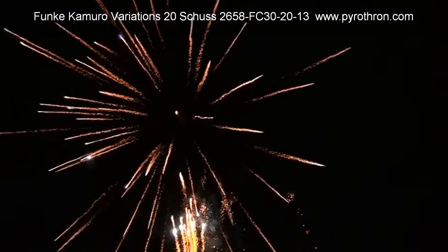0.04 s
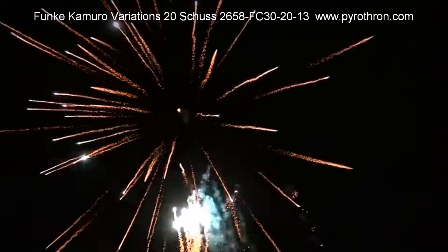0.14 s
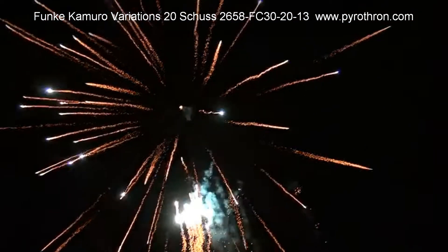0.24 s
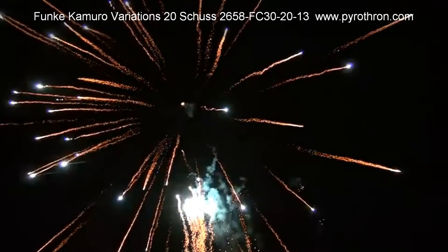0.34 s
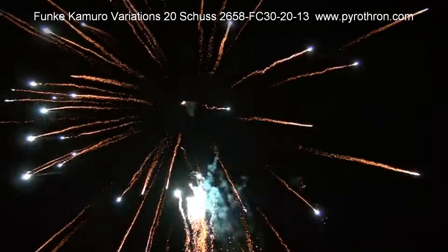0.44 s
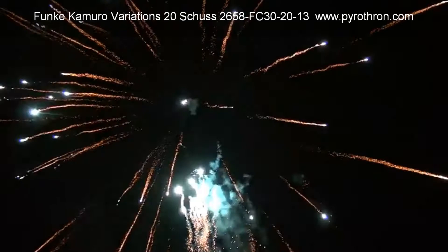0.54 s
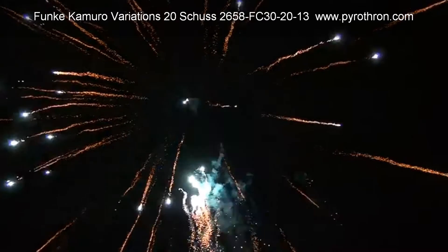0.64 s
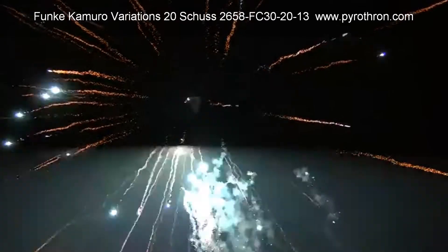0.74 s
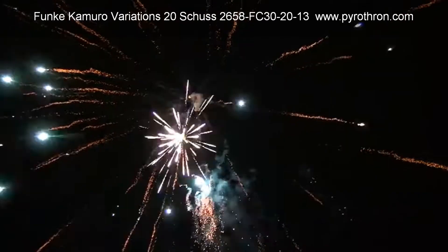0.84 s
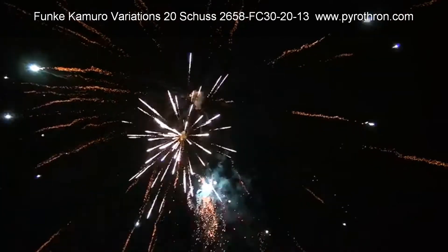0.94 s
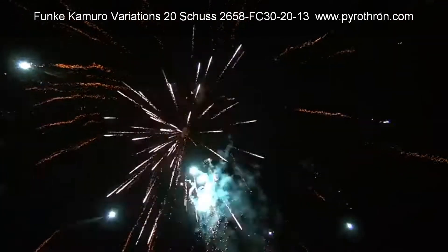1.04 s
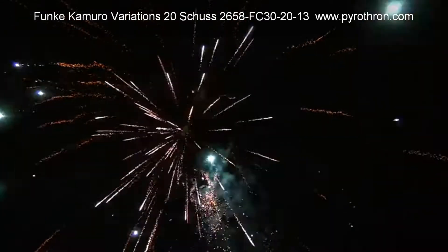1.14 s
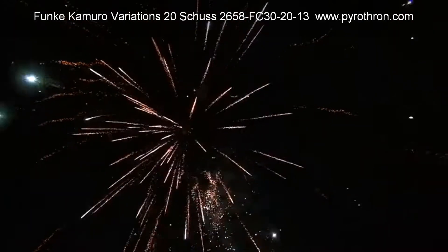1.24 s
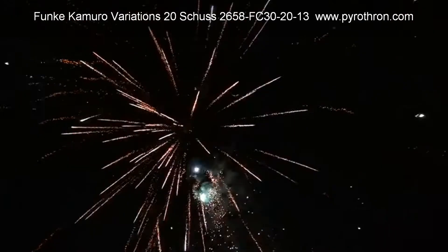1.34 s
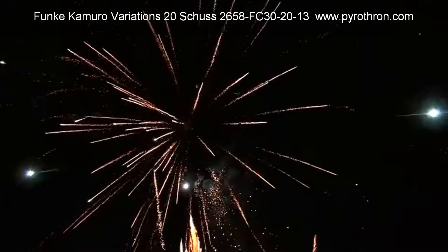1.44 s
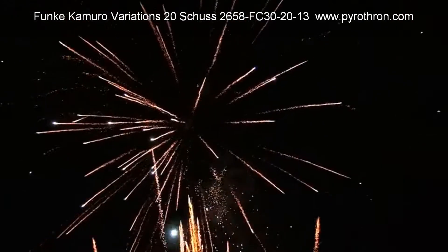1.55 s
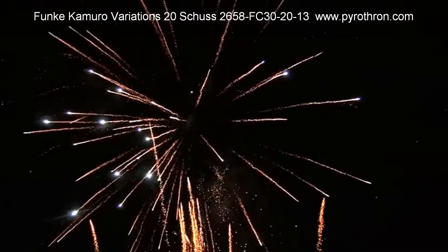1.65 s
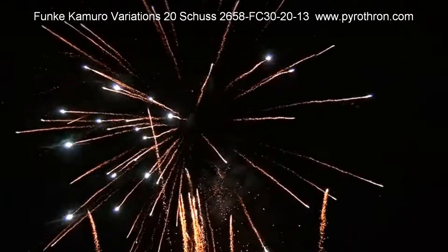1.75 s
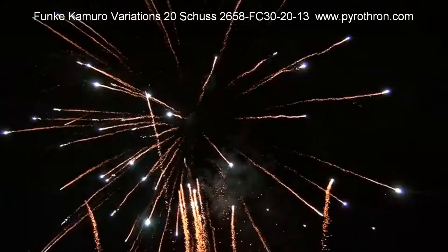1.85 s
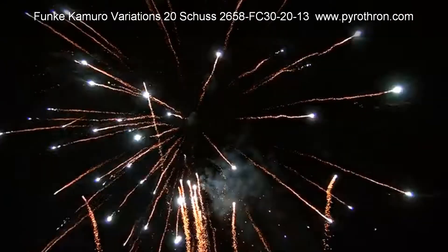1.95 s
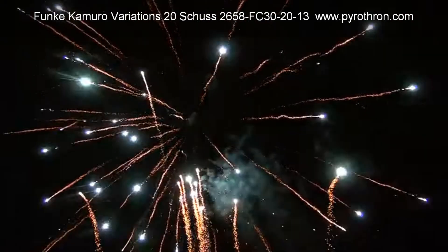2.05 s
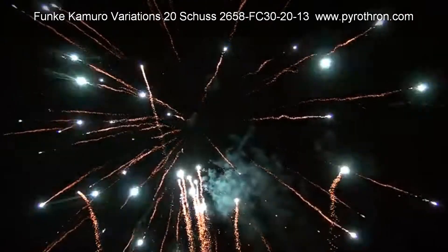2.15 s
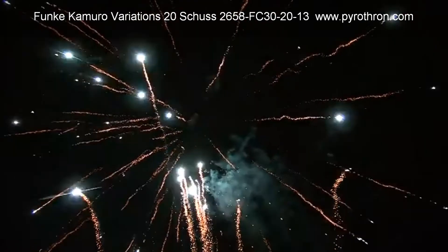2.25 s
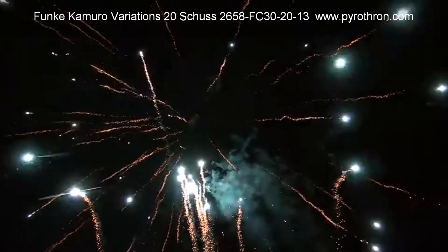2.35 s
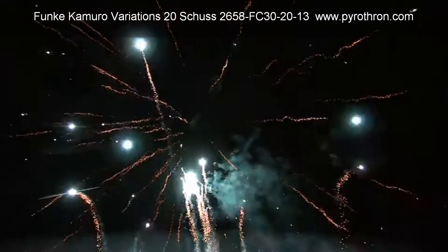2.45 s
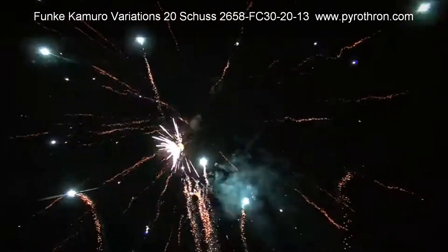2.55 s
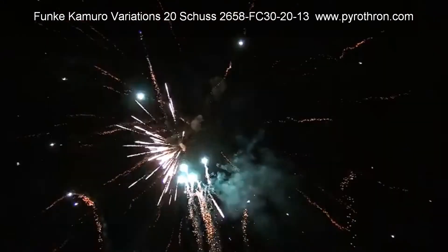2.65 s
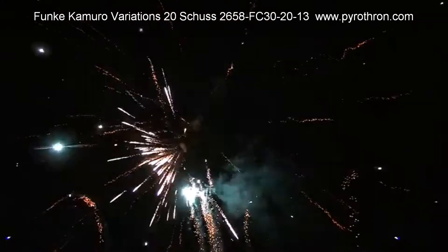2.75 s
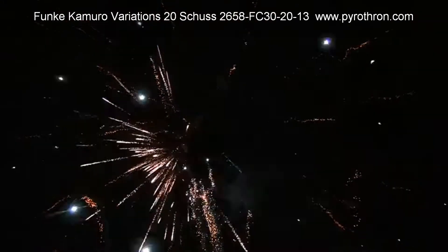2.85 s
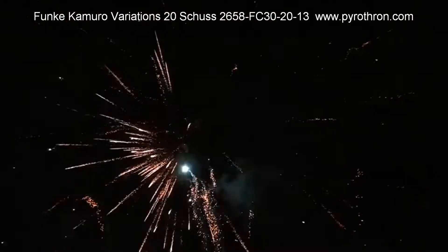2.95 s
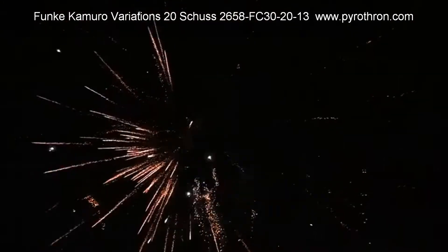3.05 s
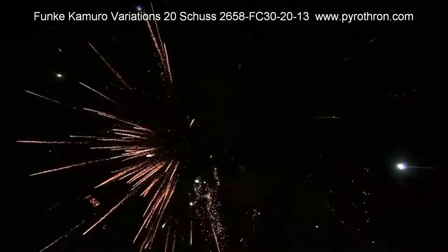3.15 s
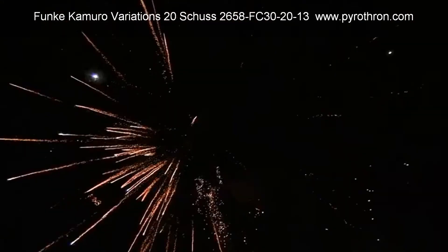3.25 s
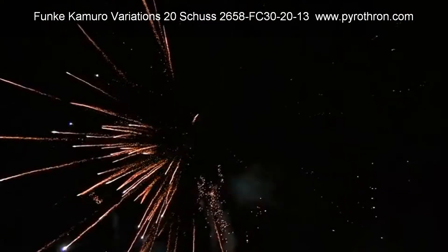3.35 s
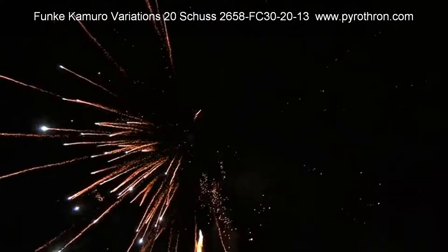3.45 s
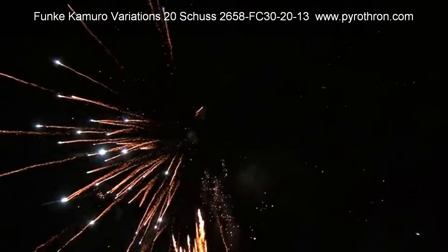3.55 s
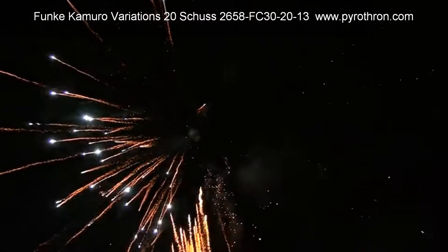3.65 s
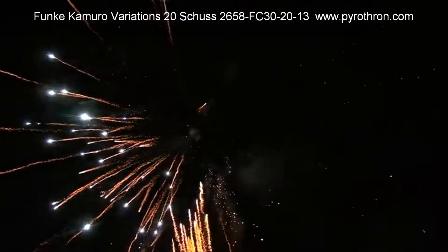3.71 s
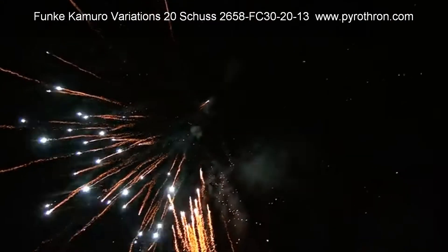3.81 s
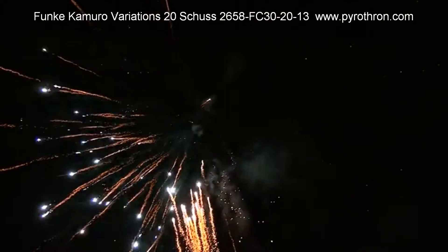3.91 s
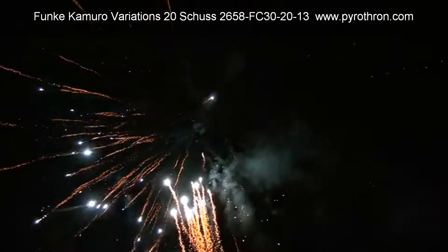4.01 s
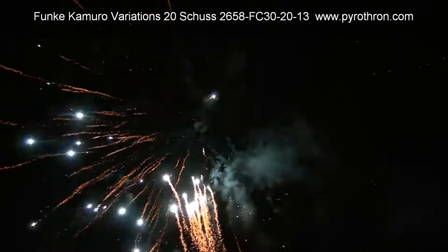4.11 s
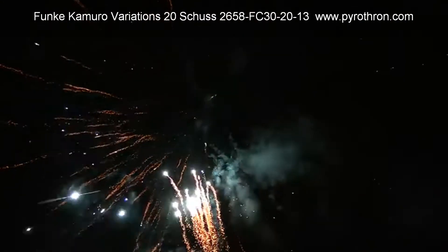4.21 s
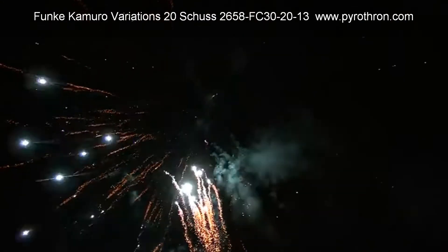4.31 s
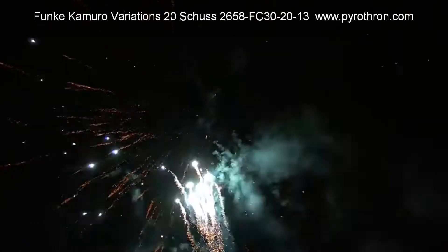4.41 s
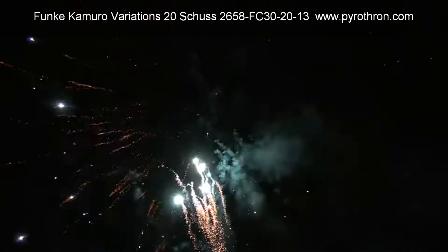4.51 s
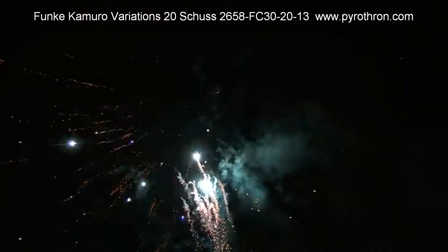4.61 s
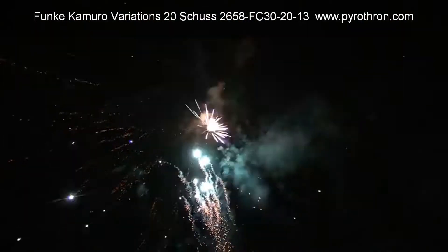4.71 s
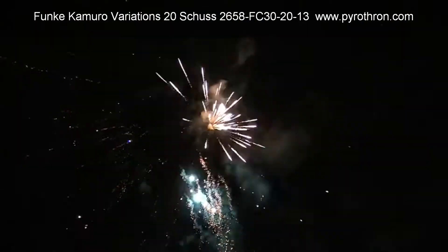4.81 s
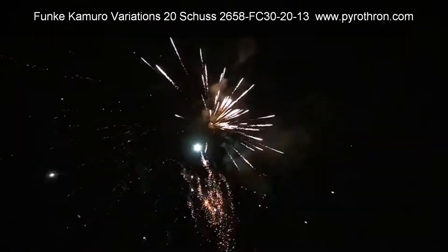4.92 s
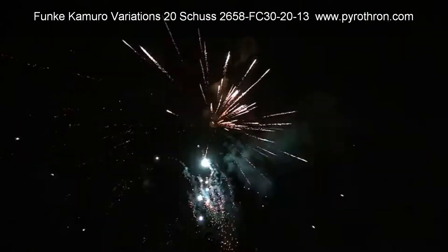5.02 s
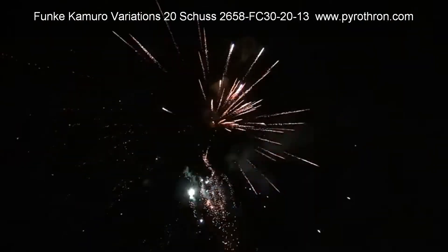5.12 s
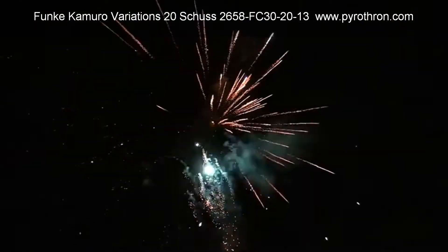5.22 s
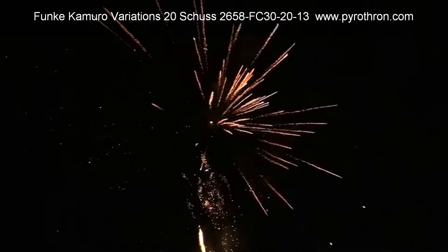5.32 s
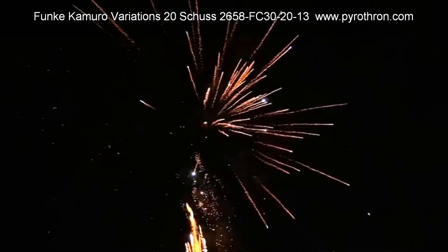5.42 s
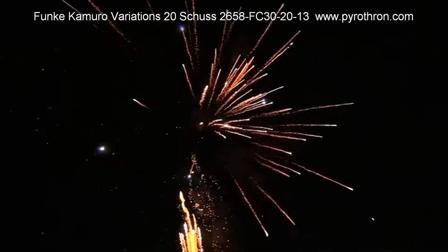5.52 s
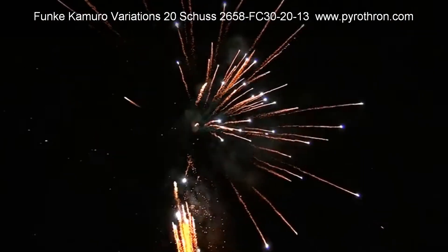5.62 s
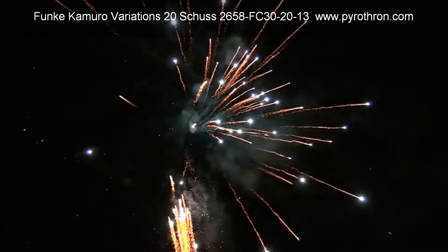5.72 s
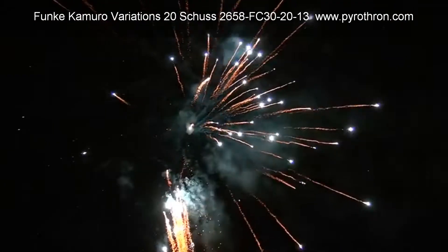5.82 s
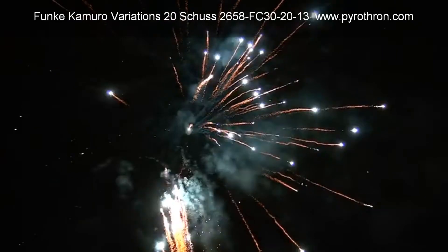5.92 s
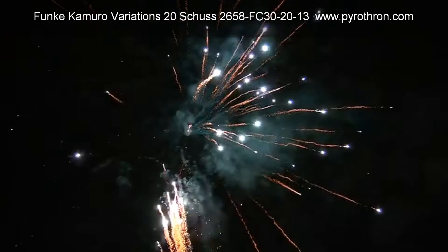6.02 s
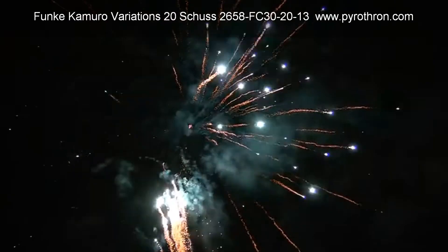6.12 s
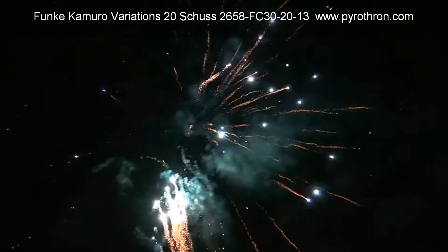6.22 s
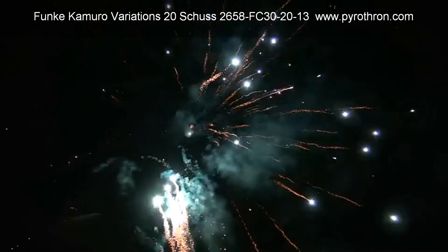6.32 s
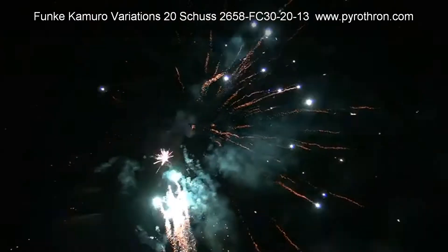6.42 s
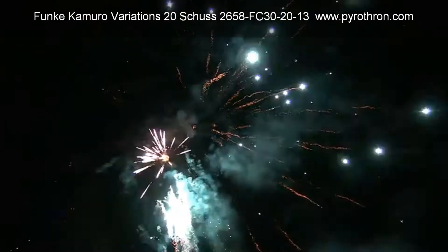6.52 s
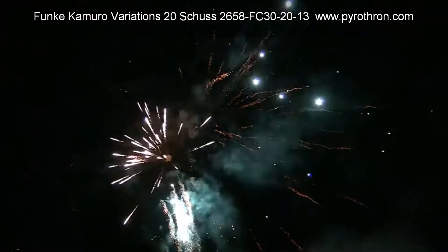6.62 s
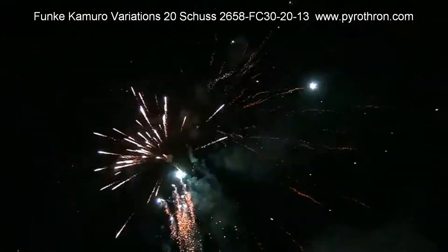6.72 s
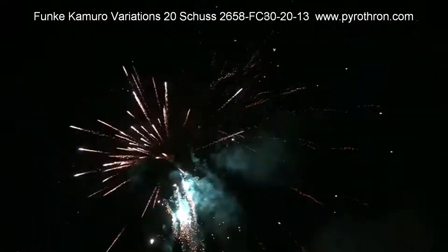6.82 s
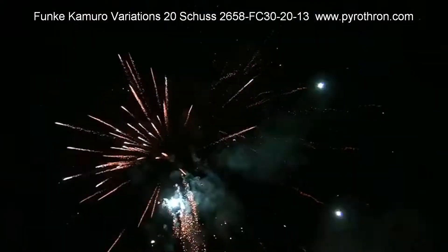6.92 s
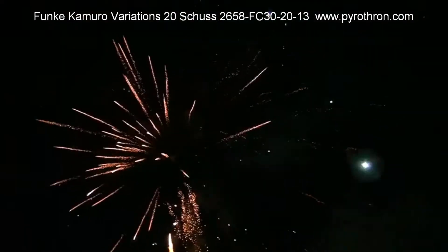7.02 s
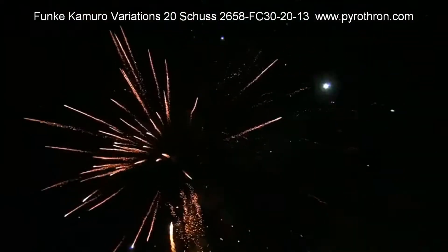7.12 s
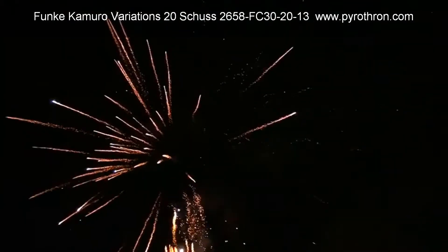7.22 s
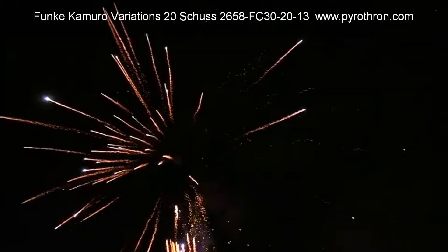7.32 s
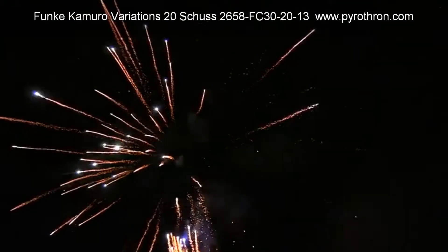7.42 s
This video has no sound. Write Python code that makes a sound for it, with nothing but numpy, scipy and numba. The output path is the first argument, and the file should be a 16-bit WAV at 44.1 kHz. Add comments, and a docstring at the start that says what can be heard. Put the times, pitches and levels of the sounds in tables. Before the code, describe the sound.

A firework battery fires steadily outdoors: thumping launches, cracking bursts, rushing echoes and a soft star fizz, heard through a hissy camcorder microphone.

```python
"""A firework battery outdoors at night, heard through a camcorder, over hiss and a thin fluttering whine.
It opens in the echoes of a shell that has already burst; four more burst about every two seconds.
Each launch spits and thumps in its tube, then slaps back from a wall; each shell bursts overhead with a crack
and a boom, rushes through nearby trees, and knocks and rolls back from the same surroundings, then its stars fizz.
Gain control ducks at loud bangs and lets the hiss back up."""
import sys
import numpy as np
from scipy import signal
from scipy.fft import rfft, irfft, next_fast_len
from scipy.io import wavfile
from scipy.ndimage import uniform_filter1d, minimum_filter1d
from numba import njit

SR = 44100
rng = np.random.default_rng(int(sys.argv[2]) if len(sys.argv) > 2 else 0)


def store_pcm(level_fs):
    """Save levels as 16-bit WAV."""
    pcm = np.round(np.clip(level_fs, -1, 1) * 32767).astype(np.int16)
    wavfile.write(sys.argv[1], SR, np.atleast_2d(pcm).T)


N = 328986

# shell bursts: (time [s], crack [dB], boom [dB], rush [dB], far echo [dB], fizzing stars [dB],
# extra travel to the walls [s])
BURSTS = [(-.57, 0, 0.5, -3, 2, -49.5, 0.016), (0.9524, 0, 0, 2.5, -0.5, -55, 0.0083),
          (2.674, -3, -2, 1.5, 0, -58, 0.0079), (4.852, -9, -1, 1.5, 0, -57.5, 0.0018),
          (6.604, 4, -4.5, -2.5, -2, -66, 0)]
# spectrum of the far roll: (frequency [Hz], relative level per Hz [dB])
FAR_SPECTRUM = [(25, -40), (60, -19), (120, -17), (210, -2), (300, -2), (410, 1.5), (560, 0.5), (780, -9),
                (1050, -9), (1700, -14.5), (2800, -22.5), (4500, -31.5), (8000, -49.5), (16000, -65)]
# spectrum of a knock from a wall: (frequency [Hz], relative level per Hz [dB])
WALL_SPECTRUM = [(60, -20), (200, 6), (450, 8), (1000, 3), (1800, -4), (3000, -17), (5000, -37),
                 (9000, -55)]
# stretches of trees and buildings that return the far roll:
# (delay [s], half-width [s], level [dB], left minus right [dB])
FAR_ECHOES = [(.03, .12, -4.5, 3.5), (.32, 0.25, -1.5, 2.5), (.57, 0.11, -5, -4), (.68, 0.093, -10, 1),
              (.84, 0.23, -15, 2), (1.17, 0.24, -17.5, 2.5), (1.43, 0.14, -27.5, 6.5), (1.75, 1, -35, 1)]
# sign of the side signal in each channel: (left), (right)
SIDES = np.array([[1], [-1]])
TRAVEL = np.arange(int(2.6 * SR)) / SR  # travel times of the echoes, s


def undb(db):
    """Decibels to gain."""
    return 10 ** (np.asarray(db) / 20)


def contour(points, hz):
    """Gain of a (frequency [Hz], level [dB]) table, joined on a log-frequency axis."""
    f, db = np.transpose(points)
    return undb(np.interp(np.log(hz + 1), np.log(f), db))


def colour(x, points, spread_db):
    """Shape two white signals with one spectrum, power kept; one is the middle, the other the diffuse side."""
    # the microphone pair: (frequency [Hz], diffuse side minus middle before spread_db [dB])
    width = [(30, -7), (60, -16), (150, -14), (1300, -26.5), (3200, -18), (4400, -12), (5600, 3.5),
             (6500, 4), (8500, 2.5), (16000, 4.5)]
    size = next_fast_len(x.shape[1] + 2048)
    hz = np.arange(size // 2 + 1) * SR / size
    gain = contour(points, hz)
    mid, side = rfft(x, size) * gain / np.sqrt(np.mean(gain ** 2))
    side = side * contour(width, hz) * undb(spread_db)
    return irfft(mid + SIDES * side, size)[:, :x.shape[1]]


def add(out, x, start):
    """Mix x into out at a time in seconds, cutting what falls outside."""
    i = int(round(start * SR))
    a, b = max(i, 0), min(i + x.shape[-1], N)
    if b > a:
        out[:, a:b] += x[..., a - i:b - i]


@njit
def lowpass(x, hz):
    """One-pole low-pass with a moving corner."""
    y, low = np.empty(len(x)), 0.
    for i in range(len(x)):
        g = np.tan(np.pi * min(hz[i], .49 * SR) / SR)
        v = (x[i] - low) * g / (1 + g)
        y[i] = low + v
        low = y[i] + v
    return y


@njit
def follow(x, attack, release):
    """Envelope that rises at one rate and sinks at another, starting from the first peak."""
    y, e = np.empty(len(x)), x[:SR // 20].max()
    for i in range(len(x)):
        e += (x[i] - e) * (attack if x[i] > e else release)
        y[i] = e
    return y


def lean(pan_db):
    """Left and right gains of a sound from one side; pan_db is left minus right."""
    return undb(SIDES * pan_db / 2)


def swell(t, peak_s, half_width_s):
    """A bell-shaped rise and fall."""
    return np.exp(-np.minimum(((t - peak_s) / half_width_s) ** 2, 20))


def returns(echoes):
    """Echo strength left and right by travel time: each reflector group gives one swell, and powers add."""
    power = 0
    for delay_s, width_s, db, pan_db in echoes:
        power = power + (undb(db) * lean(pan_db) * swell(TRAVEL, delay_s, width_s)) ** 2
    return np.sqrt(power)


def scatter(strength, spectrum, air_hz, grain_db, clump_db, spread_db):
    """A bang thrown back by countless reflectors: each sends one small copy, later ones duller from the air."""
    t = TRAVEL
    draw = rng.standard_normal((4, len(t)))
    # reflectors stand in groups, so the copies arrive in clumps, about ninety a second
    clumps = np.interp(t * 90, np.arange(len(t)), draw[3])
    sizes = undb(grain_db * draw[2] + clump_db * clumps)
    copies = draw[:2] * sizes / np.sqrt(np.mean(sizes ** 2))
    sound = colour(copies, spectrum, spread_db)
    # air absorbs with the square of frequency: each corner is air_hz after one second of travel
    corner = air_hz / np.sqrt(t + 1 / SR)
    dulled = np.array([lowpass(lowpass(c, corner), corner) for c in sound])
    # the farthest reflectors thin out to nothing over the last half second
    return dulled * strength * np.minimum((t[-1] - t) / .5, 1)


def snap(spectrum, decay_s, front):
    """A sharp pressure front with a short noisy wake, centred in a tenth of a second."""
    t = np.arange(-SR // 20, SR // 20) / SR
    x = rng.standard_normal((2, len(t))) * np.exp(-np.abs(t) / decay_s) * (t >= 0)
    x[0, np.argmin(np.abs(t))] += front
    return colour(x, spectrum, spread_db=6)


def background():
    """The stars of each shell fizz as they burn out, over steady microphone hiss and a thin fluttering whine."""
    # hiss spectrum: (frequency [Hz], relative level per Hz [dB])
    hiss_spectrum = [(100, -12), (3000, -7), (6000, 6.5), (9000, 0), (13000, 2), (16000, -1)]
    hiss_db, whine_db, whine_hz = -63.5, -63.5, 4350
    t = np.arange(N) / SR
    fizz = 0
    for s, _, _, _, _, fizz_db, _ in BURSTS:
        fizz = fizz + undb(fizz_db) * swell(t - s, peak_s=1.1, half_width_s=.55)
    noise = colour(rng.standard_normal((2, N)), hiss_spectrum, spread_db=-7.0)
    hiss = noise * np.hypot(undb(hiss_db), fizz)  # hiss and fizz add in power
    # slow noise sets the strength of the whine
    flutter = uniform_filter1d(uniform_filter1d(rng.standard_normal(N), size=120), size=80)
    whine = flutter / flutter.std() * np.sin(2 * np.pi * whine_hz * t)
    return hiss + undb(whine_db) * whine


def rushes():
    """Twigs and leaves scatter each crack into a bright rush, in one surge for each belt of trees."""
    # rush spectrum: (frequency [Hz], relative level per Hz [dB])
    rush_spectrum = [(100, -16.5), (500, 3.5), (900, -3), (1200, 2.5), (1900, -3), (3000, -7),
                     (4800, -16.5), (6000, -16), (8500, -26), (12000, -25.5), (16000, -33)]
    # belts of trees: (delay [s], half-width [s], level [dB], left minus right [dB])
    tree_echoes = [(.072, 0.044, -2, -0.5), (.15, 0.048, -5, 2), (.28, 0.15, -7, -0.5),
                   (.55, 0.25, -20, -4), (1.2, 0.43, -40, -2.5)]
    out = np.zeros((2, N))
    trees = returns(tree_echoes)
    for s, _, _, rush_db, *_ in BURSTS:
        rush = scatter(trees, rush_spectrum, air_hz=7060, grain_db=4, clump_db=1.5, spread_db=0.0)
        add(out, undb(rush_db) * rush, s)
    return out


def knocks():
    """Every large wall returns one dull knock of every burst, a little later if the shell is farther off."""
    # large distant walls that stand out of the roll: (delay [s], level [dB], left minus right [dB])
    walls = [(.473, -10, -2.5), (.634, -13.5, 2), (0.672, -13.5, 5), (.94, -16.5, 1), (1.065, -21.5, 4),
             (1.229, -21.5, 2), (1.408, -30, 4), (1.425, -28.5, -2), (1.819, -33, 0)]
    out = np.zeros((2, N))
    for s, _, _, _, far_db, _, detour_s in BURSTS:
        for delay_s, db, pan_db in walls:
            knock = snap(WALL_SPECTRUM, decay_s=.0075, front=14)
            add(out, undb(far_db + db) * lean(pan_db) * knock, s + delay_s + detour_s - 1 / 20)
    return out


def spit(width_s):
    """A few milliseconds of gas tearing out of the muzzle, centred in a tenth of a second."""
    # gas spectrum: (frequency [Hz], relative level per Hz [dB])
    gas_spectrum = [(200, -6), (1000, 3), (2800, 2), (4800, 1), (7000, -7), (12000, -7), (16000, -13)]
    t = np.arange(-SR // 20, SR // 20) / SR
    puff = rng.standard_normal((2, len(t))) * np.exp(-(t / width_s) ** 2)
    return colour(puff, gas_spectrum, spread_db=-8)


def thump(hz, length_s):
    """The air column of the tube swings for three to four cycles."""
    t = np.arange(int(length_s * SR)) / SR
    return -np.sin(2 * np.pi * hz * t) * np.sin(np.pi * t / length_s)


def launches():
    """Gas spits, the tube thumps, a wall throws both back, the surroundings rumble and a weak roll returns."""
    # launches: (time [s], spit [dB], spit half-width [s], thump [dB], wall slap [dB], tail [dB])
    launch_table = [(1.136, -6, 0.0026, 11, 21, -5), (3.158, -3.5, 0.0028, 17, 22.5, 3.5),
                    (5.045, -4, 0.0038, 22, 21.5, 4.5), (6.5512, -13, 0.0045, 13.5, 18, 0)]
    # rumble spectrum: (frequency [Hz], relative level per Hz [dB])
    rumble_spectrum = [(25, -35), (55, -5.5), (100, 3.5), (160, -2.5), (300, -5.5), (800, -14.5),
                       (1400, -16.5), (3000, -24), (6000, -37.5), (9000, -45.5), (16000, -45.5)]
    slap_s = .032  # delay of the wall behind the battery
    battery_pan_db, roll_db = 3.5, -16  # the roll is weaker than that of a burst
    direct, roll = np.zeros((2, N)), np.zeros((2, N))
    fade = undb(-42 * TRAVEL)  # 42 dB per second
    far = returns(FAR_ECHOES)
    for s, spit_db, spit_s, thump_db, wall_db, tail_db in launch_table:
        add(direct, undb(spit_db) * spit(spit_s), s - 1 / 20)
        add(direct, undb(thump_db) * thump(hz=133.3, length_s=0.026), s + 0.0036)
        # the shell leaving the tube adds a higher push
        add(direct, undb(thump_db - 5.5) * thump(hz=225, length_s=.018), s + 0.00076)
        # the wall answers with the spit smeared, a dull knock and the thump
        wall_s = s + slap_s
        add(direct, undb(wall_db - 34.5) * spit(width_s=0.0074), wall_s - 1 / 20)
        knock = snap(WALL_SPECTRUM, decay_s=0.0014, front=16.4)
        add(direct, undb(wall_db - 16) * knock, wall_s + 0.00091 - 1 / 20)
        add(direct, undb(wall_db) * thump(hz=130.6, length_s=0.026), wall_s)
        rumble = scatter(fade, rumble_spectrum, air_hz=10000, grain_db=1.5, clump_db=2.5, spread_db=-3.0)
        add(direct, undb(tail_db) * rumble, s)
        far_roll = scatter(far, FAR_SPECTRUM, air_hz=6960, grain_db=4.5, clump_db=2, spread_db=-1.0)
        add(roll, undb(roll_db) * far_roll, s)
    return direct * lean(battery_pan_db) + roll


def bursts():
    """Each shell cracks, booms off the ground and houses and rolls in from afar."""
    # crack and boom spectra: (frequency [Hz], relative level per Hz [dB])
    crack_spectrum = [(60, -17), (200, 10), (600, 8.5), (1400, 3), (3000, -13), (5000, -17), (6500, -10),
                      (9000, -24), (16000, -21)]
    boom_spectrum = [(25, -35), (50, -25), (85, -5), (130, -1), (220, -4), (350, -5.5), (600, -16),
                     (1000, -37), (3000, -50)]
    # nearby ground and houses that return the boom:
    # (delay [s], half-width [s], level [dB], left minus right [dB])
    near_echoes = [(.01, 0.015, 2, 3.5), (.045, 0.045, 6, 3), (.12, 0.028, 1.5, 9), (.2, 0.43, 0.5, 3.5),
                   (1.25, 0.34, -30.5, 5)]
    shell_pan_db = -3
    out = np.zeros((2, N))
    near, far = returns(near_echoes), returns(FAR_ECHOES)
    for s, crack_db, boom_db, _, far_db, *_ in BURSTS:
        crack = snap(crack_spectrum, decay_s=.0009, front=9.8)
        add(out, undb(crack_db) * lean(shell_pan_db) * crack, s - 1 / 20)
        boom = scatter(near, boom_spectrum, air_hz=6000, grain_db=5, clump_db=1.5, spread_db=-5)
        add(out, undb(boom_db) * boom, s)
        roll = scatter(far, FAR_SPECTRUM, air_hz=6430, grain_db=2.5, clump_db=1.38, spread_db=-1.0)
        add(out, undb(far_db) * roll, s)
    return out


def scene():
    """Bangs and echoes lean each to its own side; the rush and the hiss spread wide."""
    return background() + rushes() + knocks() + launches() + bursts()


def gain_control(x, threshold_db, ratio, attack_s, release_s, deaf_below_hz):
    """Turn loud sound down at once and come back slowly; the detector hardly hears the bass."""
    bass_cut = signal.butter(2, deaf_below_hz, "high", fs=SR, output="sos")
    heard = signal.sosfilt(bass_cut, x.mean(axis=0))
    envelope = follow(np.abs(heard), 1 / (1 + attack_s * SR), 1 / (1 + release_s * SR))
    gain = np.maximum(envelope / undb(threshold_db), 1) ** (1 / ratio - 1)
    # it looks a millisecond ahead
    ahead = minimum_filter1d(gain, size=88)
    return x * uniform_filter1d(ahead, size=44)


def record(dry):
    """The camcorder rides the gain, clips whatever exceeds full scale and cuts the top."""
    held = gain_control(dry, threshold_db=-18.5, ratio=2.965, attack_s=0.000077, release_s=0.26,
                        deaf_below_hz=195)
    top_cut = signal.ellip(8, .2, 70, 15600, fs=SR, output="sos")  # ripple dB, stopband dB, edge Hz
    return signal.sosfilt(top_cut, np.clip(held, -1, 1))


dry = scene()
out = record(dry)
store_pcm(out)
```